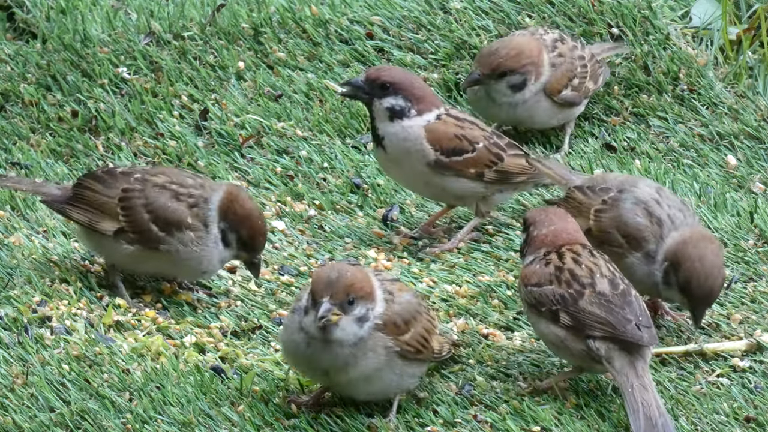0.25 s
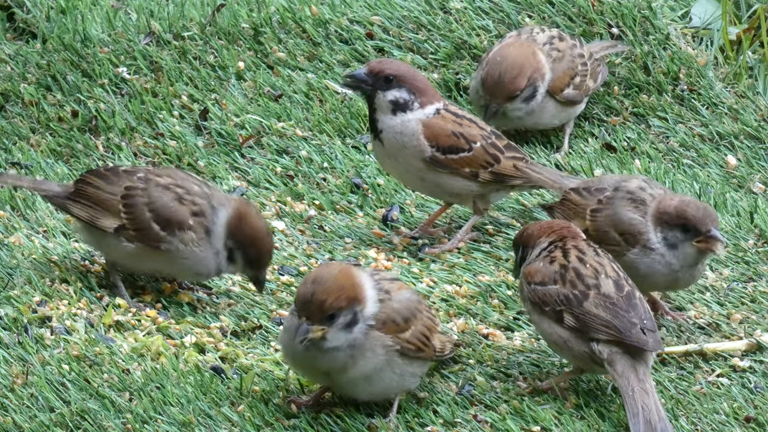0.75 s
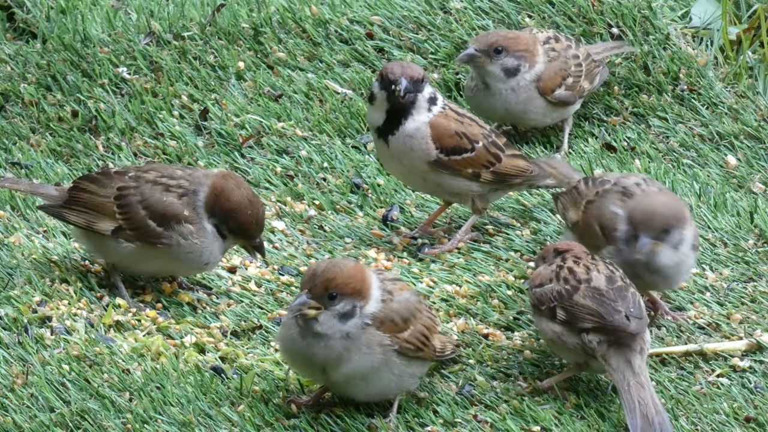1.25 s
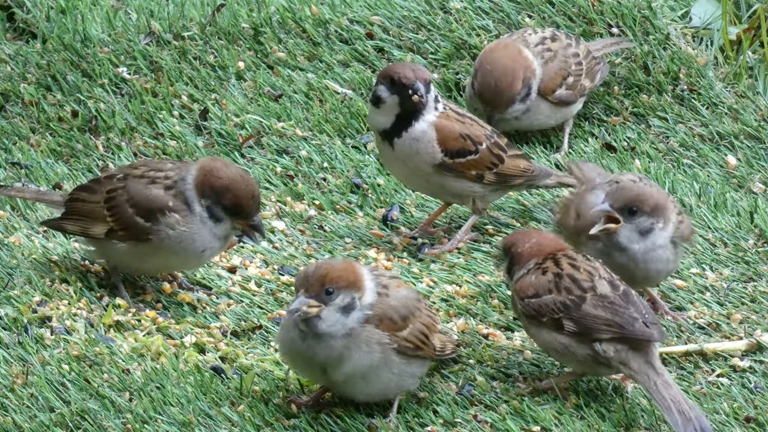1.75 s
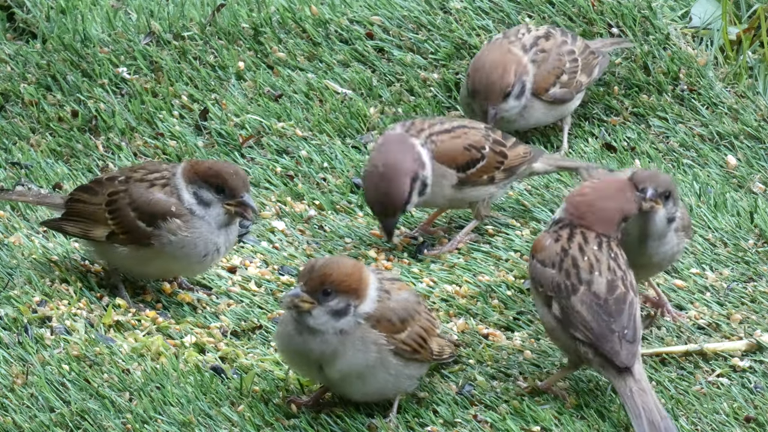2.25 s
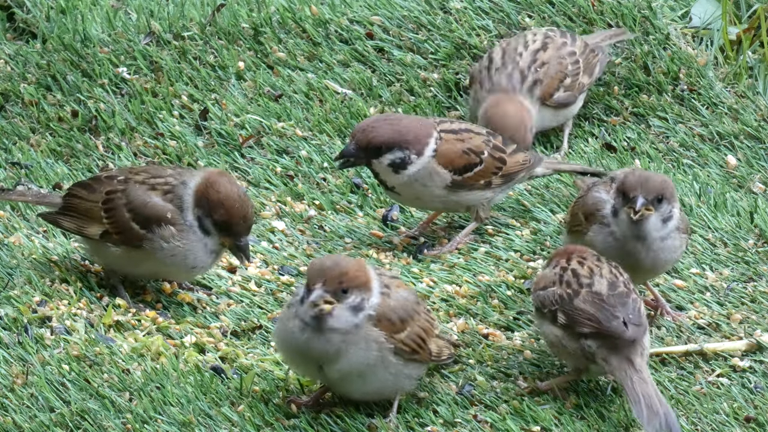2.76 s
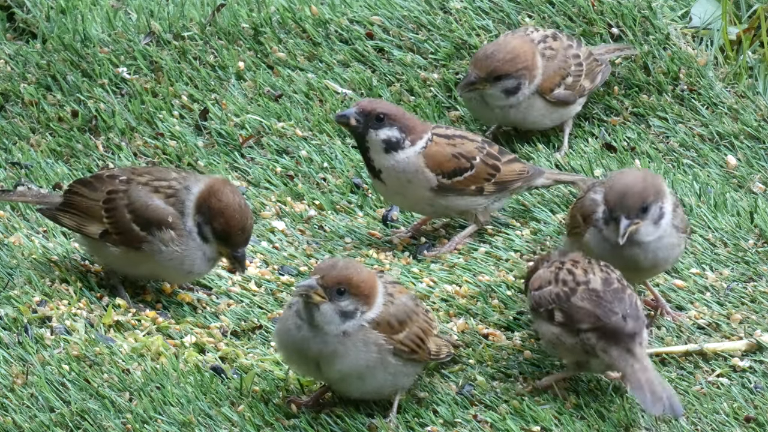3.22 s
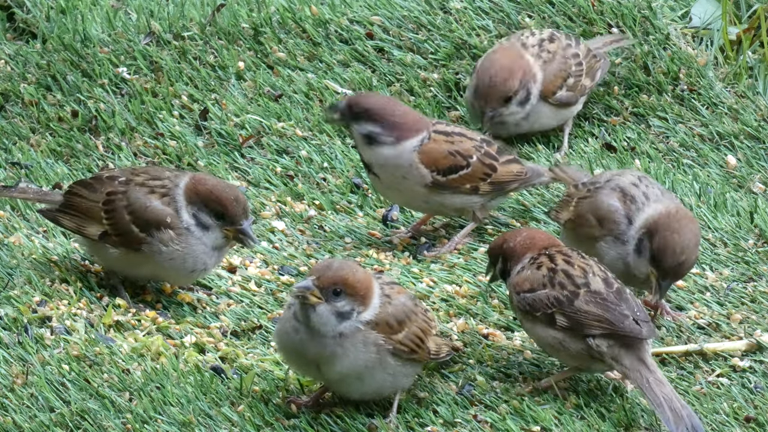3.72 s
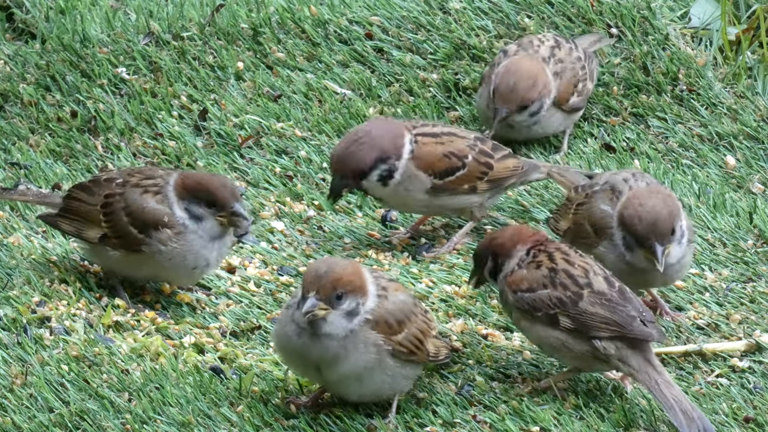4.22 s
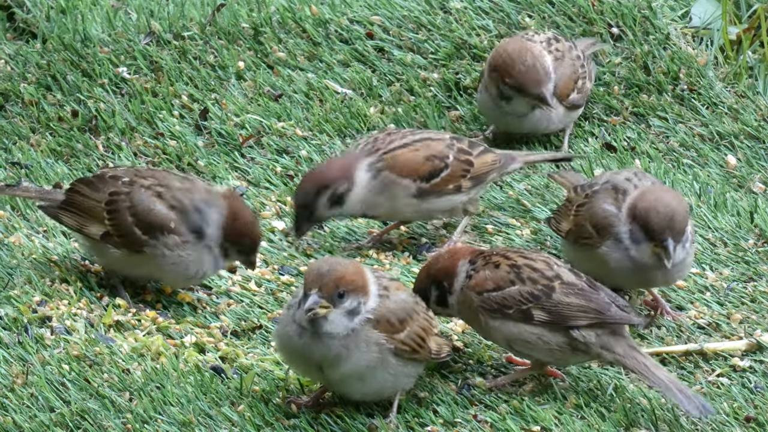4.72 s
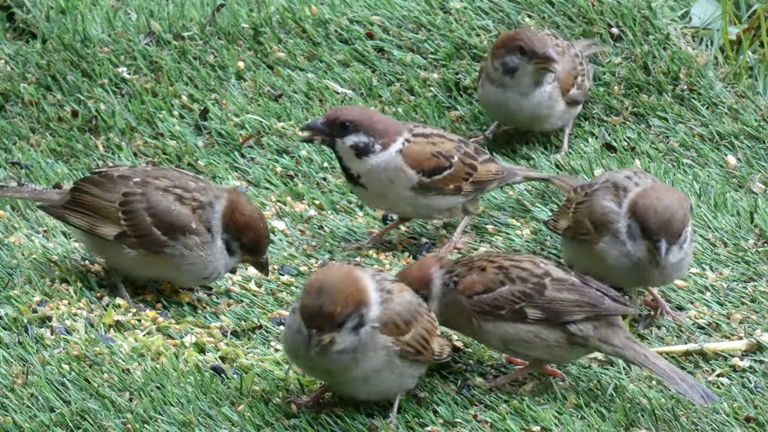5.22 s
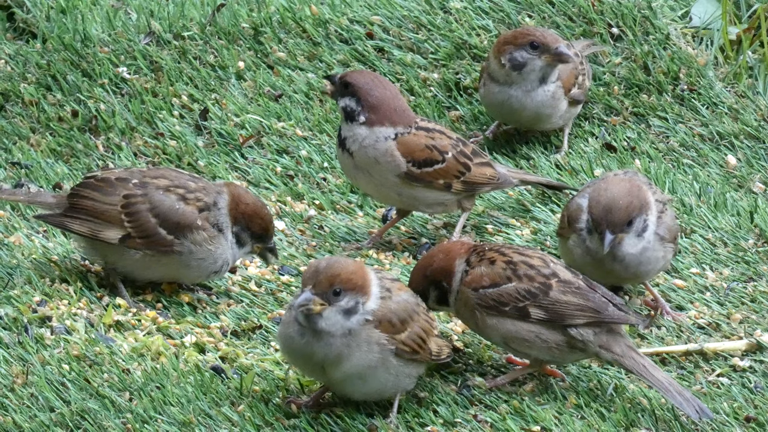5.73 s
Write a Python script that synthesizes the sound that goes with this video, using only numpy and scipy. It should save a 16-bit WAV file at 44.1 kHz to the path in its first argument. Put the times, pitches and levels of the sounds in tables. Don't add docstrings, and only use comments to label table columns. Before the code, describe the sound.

Outdoors on a lawn between walls, a few small birds call one after another for six seconds: clear two-toned falling chirps, sharp single cheeps and rough scratchy double rasps. Tiny high squeaks and very faint far peeps slip between them. Short gaps let the diffuse echoes fade into a quiet, low traffic rumble leaning slightly right. Natural close stereo pickup.

```python
import sys
import numpy as np
from scipy import signal
from scipy.io import wavfile
from scipy.ndimage import uniform_filter1d

SR = 44100
rng = np.random.default_rng(int(sys.argv[2]) if len(sys.argv) > 2 else 0)


def natural_amplitude(level_db):
    exponent = np.asarray(level_db, float) / 20
    return 10 ** exponent


def log_audio(samples):
    frames = np.atleast_2d(samples).T
    limited = np.clip(frames, -1, 1)
    pcm = np.round(limited * 32767).astype(np.int16)
    wavfile.write(sys.argv[1], SR, pcm)


N = 263718

# pitch_hz [Hz], density_db [dB per Hz]
TRAFFIC_SPECTRUM = [(11, -32), (18, -2.5), (70, -3.5), (96, -6), (123, -10), (217, -12.5), (243, -13.5),
                    (314, -17.5), (383, -18), (569, -19), (619, -17.5), (921, -18.5), (2940, -37),
                    (8860, -43), (15600, -44.5)]
TRAFFIC_DB = -52.5
# pitch_hz [Hz], likeness [0-1]
TRAFFIC_LIKENESS = [(25, .66), (60, .68), (125, .38), (250, .27), (500, .26), (1500, .1), (8000, .02)]
# pitch_hz [Hz], width_hz [Hz], level_db [dB]
ENGINE_HUMS = [
    (76.3, 17.3, -57),
    (117.7, 10.3, -61),
]

# time_s [s after start], pitch_hz [Hz], level_db [dB]
CHIRP_LOW_VOICE = [
    (0, 1950, -21.5),
    (.006, 2150, -33.5),
    (.020, 3800, -5.5),
    (.025, 3400, -8),
    (.030, 3750, 2),
    (.033, 2950, -19),
    (.040, 2850, -10.5),
    (.055, 2050, -21.5),
    (.067, 1600, -28),
]
# time_s [s after start], pitch_hz [Hz], level_db [dB]
CHIRP_HIGH_VOICE = [
    (0, 3050, -44),
    (.007, 3350, -14),
    (.021, 5300, -3.5),
    (.025, 4400, -6.5),
    (.029, 5300, 0),
    (.033, 4200, -20),
    (.040, 4750, -5),
    (.056, 3900, 1.8),
    (.080, 2400, -9),
]
# time_s [s after start], pitch_hz [Hz], level_db [dB]
CHEEP_VOICE = [
    (0, 2123, -19),
    (.005, 3967, -4.5),
    (.012, 5407, -6.5),
    (.017, 4000, 3.5),
    (.022, 4913, 1),
    (.029, 2902, -10.5),
    (.036, 3450, 6.5),
    (.040, 2925, -8),
    (.050, 2330, -24.5),
]
# start_s [s], pitch [factor], fall_length [factor], level_db [dB], breath_db [dB]
CHIRP_CALLS = [
    (0.238, 1.01, 1.08, -29.5, -32.5),
    (1.68, 1.002, 1.01, -30, -23.5),
    (3.418, .97, 1.1, -30.5, -30),
    (4.641, 0.91, 1.01, -30, -20),
]
# start_s [s], pitch [factor], fall_length [factor], level_db [dB], breath_db [dB]
CHEEP_CALLS = [
    (1.0597, 1.045, 1.001, -26, -26.5),
    (2.501, 1.005, 0.98, -26.5, -24),
    (4.139, .99, 1.001, -27, -30.5),
    (5.312, 1.027, 1.02, -28, -25),
]
LEAD_IN_S = .004

# start_s [s], from_hz [Hz], to_hz [Hz], octave_db [dB],
# low_hz [Hz], to which the low voice then drops
RASP_OPENINGS = [(0.475, 1810, 4000, -11.5, 2592), (0.597, 3180, 3685, 0.5, 2450),
                 (1.353, 3300, 3278, -8, 1895), (1.469, 3210, 3467, -10.5, 1885),
                 (1.936, 3010, 3638, -2.5, 2464), (2.075, 2280, 3280, -3.8, 2097),
                 (3.623, 2175, 3930, -8.5, 2207), (3.733, 2970, 3664, 1.5, 2189),
                 (3.841, 2880, 3165, 1, 2411), (4.043, 2320, 2400, -5.5, 2217),
                 (4.814, 3355, 3515, -12.5, 2163), (4.929, 2500, 3280, -3.5, 2020)]
# join_s [s], when the low voice joins, level_db [dB],
# end_hz [Hz] of the low voice, length_s [s], roughness [0-1]
RASP_BODIES = [(0.49, -25.5, 1677, 0.03, 0.89), (0.605, -28.5, 1114, 0.031, 0.77),
               (1.358, -30.5, 1328, 0.036, 1.09), (1.469, -30, 1273, .036, 0.42),
               (1.943, -28, 1553, 0.029, 0.84), (2.078, -29, 1511, 0.03, 0.89),
               (3.635, -29.5, 1298, .042, 0.9), (3.739, -26.5, 1223, .04, 0.93),
               (3.847, -25.5, 1156, .03, 0.67), (4.046, -47, 1576, 0.027, 0.7),
               (4.823, -26.5, 1035, 0.029, 0.66), (4.933, -28.5, 1213, 0.04, 0.19)]
# pitch_hz [Hz], density_db [dB per Hz]
THROAT_COLOUR = [(410, -73), (700, -36), (1030, -18), (2050, -5), (2910, -2.5), (3580, -9.5), (3870, -6),
                 (5150, -9), (8210, -26), (12800, -25), (15500, -80.5)]
OPENING_DB, OPENING_SHAKE = -4, .058
RASP_PAN_DB = 2.5
BEAK_HZ, BEAK_HZ_PER_DB, BEAK_DB = 4770, 101.5, 7
OCTAVE_STAYS_DB = 15.5

# start_s [s], level_db
# # [dB], pitch_hz [Hz], length_s [s], left_right_db [dB]
NEAR_SQUEAKS = [
    (.479, -38.5, 6100, 0.011, 6),
    (1.682, -39.5, 6380, 0.0045, 2),
    (1.7, -44, 6320, .011, 2.1),
    (4.645, -42, 6400, 0.0076, -4),
    (4.66, -29.5, 5385, 0.018, -3),
    (4.7, -45, 5800, 0.0049, -1),
    (4.744, -42, 2605, 0.019, -6),
    (4.746, -53.5, 1410, .022, -9),
]
# start_s [s],
# level_db [dB], pitch_hz [Hz], length_s [s], left_right_db [dB]
FAR_PEEPS = [
    (.603, -54.5, 7300, 0.0194, -3),
    (0.902, -82, 4600, .09, -16),
    (2.893, -77, 3605, 0.16, -10),
    (4.427, -70, 3130, 0.01, 1),
    (4.44, -76, 5900, 0.041, 8),
    (4.546, -64.5, 5870, 0.0036, -5),
    (4.557, -70.5, 4890, 0.011, 4),
]
PEEP_DROOP = .06

# pitch_hz [Hz], t60_s [s], left_right_likeness [0-1]
YARD_DECAY = [
    (926, 0.37, 0.9),
    (2500, 0.55, 0.63),
    (4000, 0.53, 0.55),
    (7300, 0.55, 0.62),
    (11950, 0.58, 0),
]
WALL_S, WALL_HZ = .044, 2500


def rms_one(x):
    return x / np.sqrt(np.mean(x ** 2) + 1e-20)


def at_hz(points, hz, column=1):
    points = np.array(points)
    return np.interp(np.log(hz), np.log(points[:, 0]), points[:, column])


def filtered(x, order, hz, kind="low"):
    return signal.sosfilt(signal.butter(order, hz, kind, fs=SR, output="sos"), x)


def wobble(size, cut_hz):
    return rms_one(filtered(rng.standard_normal(size + 600), 2, cut_hz)[600:])


def spread(mid, side, alike):
    return np.sqrt(1 + alike) * mid + np.sqrt(1 - alike) * side * [[1], [-1]]


def add(out, start_s, x, pan_db):
    i = round(start_s * SR)
    out[:, i:i + len(x)] += x * natural_amplitude(np.array([[pan_db], [-pan_db]]) / 2)


def traffic():
    out, edges = 0, 18 * 2 ** np.arange(0, 10, 1 / 3)
    white = rng.standard_normal((2, 2, N + SR))
    slow = np.arange(N) / 2000
    for k, (low, high) in enumerate(zip(edges, edges[1:])):
        mid, side = filtered(white[k % 2], 2, [low, high], "band")[:, SR:]
        hz = np.sqrt(low * high)
        alike = np.clip(at_hz(TRAFFIC_LIKENESS, hz), -.99, .99)
        drift_db = 0.91 * np.interp(slow, np.arange(140), rng.standard_normal(140))
        out = out + natural_amplitude(at_hz(TRAFFIC_SPECTRUM, hz) + drift_db) * spread(mid, side, alike)
    out = natural_amplitude(TRAFFIC_DB) * rms_one(out)
    for hz, width_hz, db in ENGINE_HUMS:
        edges_hz = [hz - width_hz / 2, hz + width_hz / 2]
        hum = filtered(rng.standard_normal(N + SR), 1, edges_hz, "band")[SR:]
        out = out + natural_amplitude(db) * rms_one(hum)
    bass = filtered(out, 1, 300)
    return out + bass * (natural_amplitude(np.array([[-1.2], [1.2]])) - 1)


def breath(size):
    return rms_one(filtered(rng.standard_normal(size), 1, [5200, 6600], "band"))


def whistle(track, pitch, length, lead_in_s, warble_hz, warble, octave_db, octave_fall_db, under_db, breath_db):
    size = 4500
    track_s, track_hz, track_db = np.transpose(track)
    since_start = np.arange(size) / SR
    t = since_start - lead_in_s
    t = np.minimum(t, .03 + (t - .03) / length)
    shake = warble * np.clip(t / .006 - 5.5, 0, 1) * np.sin(2 * np.pi * warble_hz * t)
    glide = uniform_filter1d(np.interp(t, track_s, track_hz), size=50)
    hz = pitch * glide * (1 + shake + .012 * wobble(size, 400))
    phase = 2 * np.pi * np.cumsum(hz) / SR
    level = natural_amplitude(np.interp(t, track_s, track_db, right=-200) + 1.5 * wobble(size, 200))
    level = level * np.clip((t + lead_in_s) / (lead_in_s + .003), 0, 1)
    highest_khz = np.maximum.accumulate(hz) / 1000
    octave = natural_amplitude(np.maximum(octave_db - octave_fall_db * (highest_khz - 2), -36))
    tone = np.sin(phase) + octave * np.sin(2 * phase) + natural_amplitude(under_db) * np.sin(phase / 2)
    return level * (tone + natural_amplitude(breath_db) * breath(size))


def chirps():
    out = np.zeros((2, N))
    for start_s, pitch, length, db, breath_db in CHIRP_CALLS:
        low = whistle(CHIRP_LOW_VOICE, pitch, length, 0, warble_hz=170, warble=.035, octave_db=8,
                      octave_fall_db=21, under_db=-50, breath_db=breath_db)
        high = whistle(CHIRP_HIGH_VOICE, pitch, length, 0, warble_hz=185, warble=.06, octave_db=-16,
                       octave_fall_db=9, under_db=-40, breath_db=breath_db)
        add(out, start_s, natural_amplitude(db) * (low + high), pan_db=-1)
    return out


def rasp_opening(from_hz, to_hz, octave_db, lead_s):
    t = np.arange(4096) / SR
    glide = np.interp(t, [0, lead_s], [from_hz, to_hz])
    phase = 2 * np.pi * np.cumsum(glide * (1 + OPENING_SHAKE * wobble(4096, 500))) / SR
    swell = np.interp(t, [0, .6 * lead_s, lead_s, lead_s + .005], [0, .55, 1, 0])
    overtones = np.sin(2 * phase) + natural_amplitude(-13.5) * np.sin(3 * phase) + natural_amplitude(-11.5) * breath(4096)
    return swell * (np.sin(phase) + natural_amplitude(octave_db) * overtones)


def rasp_body(to_hz, octave_db, low_hz, end_hz, length_s, rough):
    t = np.arange(4096) / SR
    lows, highs = np.mgrid[-2:9, 0:3].reshape(2, -1, 1)
    progress = np.clip(t / length_s, 0, 1.2)
    sag = 1 - (1 - end_hz / low_hz) * progress ** 1.35
    low = low_hz * sag + (to_hz - low_hz) * np.exp(-t / 0.0028)
    low = low * (1 + 0.082 * np.sin(2 * np.pi * 150 * t) + 0.0803 * rough * wobble(4096, 490))
    high = to_hz * sag ** .5 * (1 + 0.0697 * rough * wobble(4096, 367))
    hz = lows * low + highs * high
    seen_hz = np.clip(hz / sag ** 0.35, 300, 20000)
    beak_hz = BEAK_HZ + BEAK_HZ_PER_DB * octave_db
    beak_db = BEAK_DB * np.exp(-(np.log2(seen_hz / beak_hz) / 0.76) ** 2)
    colour_db = at_hz(THROAT_COLOUR, seen_hz) + beak_db - 21 * (1.1 - rough) * highs
    colour_db = colour_db - 2.5 * progress * np.log2(seen_hz / 2600)
    colour_db = colour_db - 6 * rough * (lows == 1) * (highs == 0)
    colour_db = colour_db + OCTAVE_STAYS_DB * natural_amplitude(octave_db) * (lows == 0) * (highs == 2)
    flicker_db = 3.5 * rough * np.array([wobble(4096, 330) for tone in lows])
    phases = 2 * np.pi * (np.cumsum(hz, axis=1) / SR + rng.random(lows.shape))
    sounding = np.clip((hz / (low_hz * sag) - .6) * 4, 0, 1) * (hz < 17000)
    voice = np.sum(natural_amplitude(colour_db + flicker_db) * sounding * np.sin(phases), axis=0)
    flow_s = [0, .004, .3 * length_s, .65 * length_s, length_s, length_s + .009]
    flow_db = np.interp(t, flow_s, [-12, -4, 0, -4, -13, -42], right=-200)
    return natural_amplitude(flow_db) * np.clip(t * 1000, 0, 1) * voice / voice[:1300].std()


def rasps():
    out = np.zeros((2, N))
    for opening, body in zip(RASP_OPENINGS, RASP_BODIES):
        start_s, from_hz, to_hz, octave_db, low_hz = opening
        join_s, db, end_hz, length_s, rough = body
        clear = rasp_opening(from_hz, to_hz, octave_db, max(join_s - start_s, .003))
        add(out, start_s, natural_amplitude(db + OPENING_DB) * clear, RASP_PAN_DB)
        harsh = rasp_body(to_hz, octave_db, low_hz, end_hz, length_s, np.clip(rough, .1, 1))
        add(out, join_s, natural_amplitude(db) * harsh, RASP_PAN_DB)
    return out


def peeps(rows, shake):
    out, t = np.zeros((2, N)), np.arange(4096) / SR
    for start_s, db, hz, length_s, pan_db in rows:
        glide = hz * (1 - PEEP_DROOP * t / length_s + shake * wobble(4096, 300))
        phase = 2 * np.pi * np.cumsum(glide) / SR
        swell = np.sin(np.pi * np.clip(t / length_s, 0, 1))
        add(out, start_s, natural_amplitude(db) * swell * np.sin(phase), pan_db)
    return out


def cheeps():
    out = np.zeros((2, N))
    for start_s, pitch, length, db, breath_db in CHEEP_CALLS:
        voice = whistle(CHEEP_VOICE, pitch, length, LEAD_IN_S, warble_hz=145.5, warble=.12,
                        octave_db=breath_db + 36, octave_fall_db=14, under_db=-27, breath_db=breath_db)
        add(out, start_s - LEAD_IN_S, natural_amplitude(db) * voice, pan_db=-1.5)
    return out


def yard(x, early_db, late_db, wall_db):
    size, out = round(.9 * SR), 0
    t = np.arange(size) / SR
    edges = 900 * 2 ** np.arange(0, 4.6, .5)
    white = rng.standard_normal((2, size))
    for low, high in zip(edges, edges[1:]):
        mid, side = filtered(white, 2, [low, high], "band")
        hz = np.sqrt(low * high)
        alike = np.clip(at_hz(YARD_DECAY, hz, column=2), 0, .99)
        out = out + spread(mid, side, alike) * natural_amplitude(-60 * t / at_hz(YARD_DECAY, hz))
    early = natural_amplitude(early_db) * natural_amplitude(-60 * t / 0.082)
    shape = np.clip(t / 0.0011 - .5, 0, 1) * (natural_amplitude(late_db) + early)
    delayed = np.roll(x, round(WALL_S * SR), axis=1)
    wall = natural_amplitude(wall_db) * filtered(delayed, 4, WALL_HZ)
    return wall + signal.fftconvolve(x.mean(axis=0)[None], out * shape, axes=1)[:, :N]


def scene():
    singers = chirps() + cheeps() + peeps(NEAR_SQUEAKS, shake=.03)
    calls = [singers, rasps(), peeps(FAR_PEEPS, shake=0.074)]
    singers, raspers, far = filtered(calls, 4, [1050, 14500], "band")
    echoes = yard(singers + natural_amplitude(16) * far, early_db=-26.0, late_db=-35.5, wall_db=-10)
    echoes = echoes + yard(raspers, early_db=-24.0, late_db=-40.5, wall_db=-23.5)
    return singers + raspers + far + echoes + traffic()


def top_cut(x):
    return signal.sosfilt(signal.butter(12, 15760, fs=SR, output="sos"), x)


def record(dry):
    return top_cut(dry)


dry = scene()
out = record(dry)
log_audio(out)
```